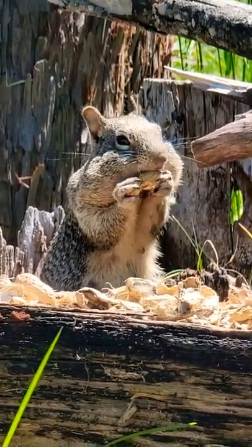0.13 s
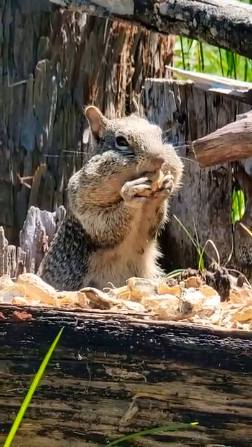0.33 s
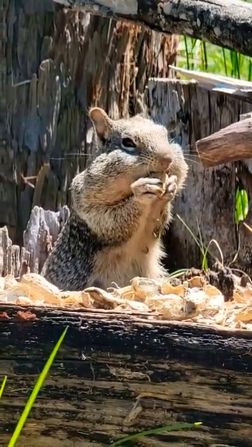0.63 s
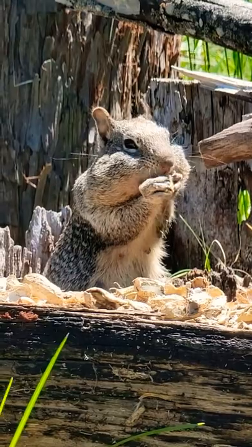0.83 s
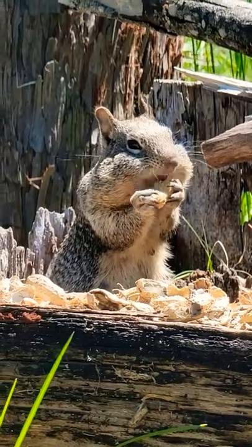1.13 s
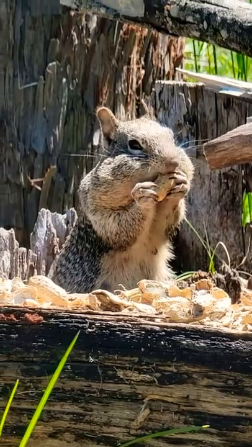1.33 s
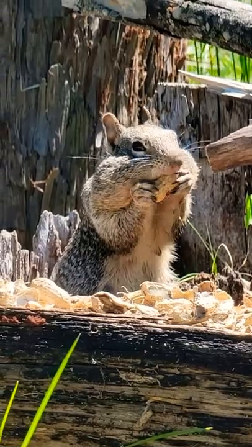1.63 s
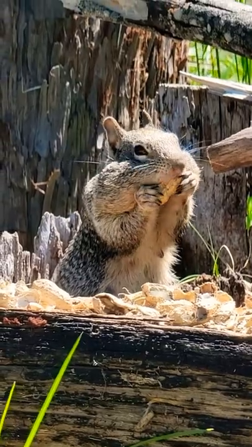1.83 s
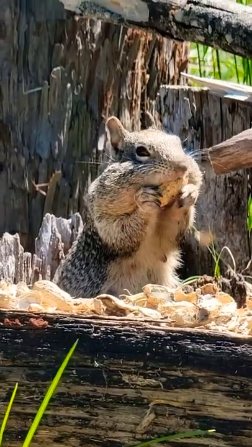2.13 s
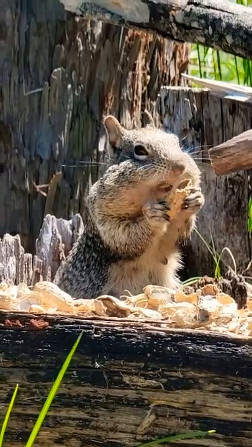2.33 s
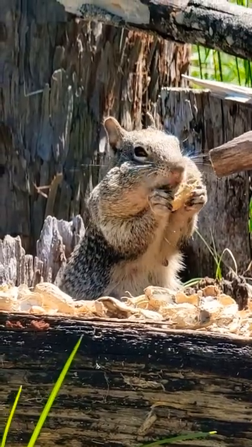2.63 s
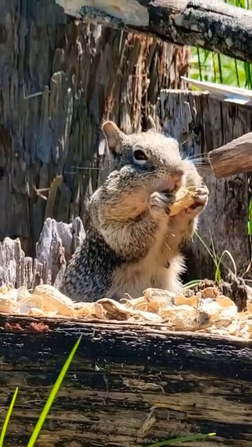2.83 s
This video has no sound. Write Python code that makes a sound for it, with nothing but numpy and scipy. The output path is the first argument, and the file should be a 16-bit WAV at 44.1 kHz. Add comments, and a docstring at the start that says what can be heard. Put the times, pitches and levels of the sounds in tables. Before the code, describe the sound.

A squirrel close to the microphone cracks a peanut shell in crisp, uneven clicks with faint gnawing, mostly in the first half; a bird repeats falling two-note chirps across a yard over low rumble and distant traffic.

```python
"""Squirrel cracking a peanut

A squirrel cracks a peanut shell with its teeth, close by, on a log in front of a stump.
Each crack is a click and short noise ringing a piece of shell; gnawing is a swell of tiny ticks.
Further off a bird repeats a falling two-note chirp, made of wavering sine tones with yard echoes.
Under both, shaped noise makes a low, lumpy rumble and distant traffic wash, with a faint hum."""
import sys
import numpy as np
from scipy import signal
from scipy.fft import rfft, irfft
from scipy.io import wavfile

SR = 44100
rng = np.random.default_rng(int(sys.argv[2]) if len(sys.argv) > 2 else 0)


def dump_mix(stems):
    """Bounce the given channels to the path in sys.argv[1] as a 16-bit WAV at rate SR."""
    frames = np.atleast_2d(stems).T  # one column per channel
    limited = np.clip(frames, -1, 1)  # hard clip at full scale
    pcm = np.round(limited * 32767).astype(np.int16)
    wavfile.write(sys.argv[1], SR, pcm)


N = 131859  # length in samples, about 3 s

# Shell cracks: start_s, level_db, crumble_s (fade time of the crumbling noise), ring_hz,
# ring_db, hollow_db (the shell's hollow sound), treble_db
CRACKS = [ (0.3364, -37, 0.00055, 8100, -4, -10, 3), (0.3446, -27, 0.00025, 10200, 9.5, 6, 3.5),
          (.3531, -33, .0004, 8100, 8, 0, 7), (0.656, -47.5, .003, 6000, 16.5, -4, -14),
          (0.7275, -42, .0006, 7500, 9, -6, 3), (.7466, -14, .0003, 5650, 17, -6, 0),
          (.7623, -29, .0006, 5600, 4, 13, -11), (0.9175, -19.5, 0.00055, 7760, 10.5, 12.5, -10),
          (0.9193, -22.5, 0.0008, 6300, 11, 10.5, -1.5), (0.946, -34, 0.0025, 7200, 4, -6, -4),
          (1.0470, -42, .0004, 8000, 0, -7, -3), (1.0683, -17.5, 0.00034, 4640, 5.5, 0.5, -1.5),
          (1.0794, -28, .0009, 14000, 8, -2, -1), (1.1940, -31, .001, 7000, 0, -13, -11),
          (1.1970, -32, 0.00042, 5450, 10, -17, 7.5), (1.1990, -26.5, 0.00056, 6100, 10, -10, 2.5),
          (2.367, -46, 0.00102, 6050, 14, -12, 2), (2.427, -46.5, 0.0058, 7460, 8, -10, 5.5),
          (2.8788, -51, .0015, 7200, 11, -10, -11)]
# Gnawing between cracks: start_s, end_s, level_db, treble_db
GNAWS = [(0.25, 0.443, -78.5, 7), (0.587, 0.748, -74.5, -22), (0.709, 0.825, -68.5, -13),
         (0.875, 1.291, -79.5, -7), (1.293, 1.468, -77.5, -29), (2.082, 2.24, -88, -0.5),
         (2.299, 2.491, -78, -8), (2.592, 2.7, -87, -14)]
# Echoes off the log and stump: left_delay_s, right_delay_s, level_db
WOOD_ECHOES = [(.0006, .0004, -10), (.0016, .0021, -10), (.0031, .0028, -15)]
STUMP_T60_S, STUMP_DB = .025, -7  # T60: time for an echo to fade by 60 dB
CRACK_YARD_T60_S, CRACK_YARD_DB = .13, -14
CRACK_PAN_DB = .6  # left goes up by this much, right goes down


def squirrel():
    """Cracks and gnawing arrive directly, then bounce off the wood nearby and the yard."""
    dry = np.zeros((2, N))
    for start_s, *settings in CRACKS:
        add(dry, start_s, crack(*settings))
    for start_s, end_s, level_db, treble_db in GNAWS:
        add(dry, start_s, gnaw(end_s - start_s, level_db, treble_db))

    near = dry.copy()
    for left_s, right_s, echo_db in WOOD_ECHOES:
        add(near[0], left_s, amp(echo_db) * dry[0])
        add(near[1], right_s, amp(echo_db) * dry[1])
    stump = amp(STUMP_DB) * tail(STUMP_T60_S, 0.0012)
    yard = amp(CRACK_YARD_DB) * tail(CRACK_YARD_T60_S, 0.0089)
    return (near + through(dry, stump + yard)) * amp([[CRACK_PAN_DB], [-CRACK_PAN_DB]])


# Basic tone of a snap: pitch_hz, level_db
SNAP = [(300, -14), (1500, -8), (2600, -7.5), (4200, -4.5), (5200, 0.5), (6800, -8), (8000, 5), (9400, -9),
        (10600, 7), (12000, -3.5), (13200, 1.5), (15000, 2.5), (15800, -4), (17000, -26)]
CLICK_GAIN, CRUMBLE_GAIN = .9, .7
# Late splinters: average rate, loudness, and fade time
SPLINTERS_PER_S, SPLINTER_DB, SPLINTER_S = 600, -9, .007
# Each piece gets random ups and downs in tone, one every PIECE_STEP_HZ
PIECE_DB, PIECE_STEP_HZ = 4, 300
RING_WIDTH_HZ = 1400
HOLLOW_HZ, HOLLOW_HALF_WIDTH_HZ = 3260, 390
TREBLE_PAN_DB = 0.8  # treble goes up by this much on the left, down on the right


def crack(level_db, crumble_s, ring_hz, ring_db, hollow_db, treble_db):
    """A snap, tiny fractures and late splinters ring a piece of shell; no two ring alike."""
    t = np.arange(1024) / SR
    spray = rng.standard_normal((2, len(t))) * np.exp(-t / crumble_s)
    spray[1] = 0.16 * spray[0] + 3.2 * spray[1]  # left and right are only slightly alike
    drive = CRUMBLE_GAIN * spray / np.linalg.norm(spray, axis=1, keepdims=True)
    drive[:, 0] += CLICK_GAIN
    is_splinter = rng.random(len(t)) < SPLINTERS_PER_S / SR
    splinters = rng.uniform(-0.83, 1, len(t)) * is_splinter
    drive += amp(SPLINTER_DB) * splinters * np.exp(-t / SPLINTER_S)

    hz = np.fft.rfftfreq(2048, 1 / SR)
    ring = amp(ring_db) / np.sqrt(1 + ((hz - ring_hz) / (RING_WIDTH_HZ / 2)) ** 4)
    hollow = amp(hollow_db) / (1 + ((hz - HOLLOW_HZ) / HOLLOW_HALF_WIDTH_HZ) ** 2)
    mode_hz = np.arange(0, SR / 2, PIECE_STEP_HZ)
    mode_db = PIECE_DB * rng.uniform(-1.1, 1, len(mode_hz))
    piece = unit(amp(np.interp(hz, mode_hz, mode_db)))
    treble = np.clip((hz - 7000) / 4000, 0, 1)  # starts at 7 kHz, full at 11 kHz
    shell = []
    for side in (1, -1):
        body = amp(read(SNAP, hz) + (treble_db + side * TREBLE_PAN_DB) * treble)
        shell.append(causal(piece * np.sqrt(body ** 2 + ring ** 2 + hollow ** 2)))
    return amp(level_db) * through(drive, np.array(shell))


GNAW_TICKS_PER_S = 450  # average rate


def gnaw(length_s, level_db, treble_db):
    """Teeth scrape the shell: a swell of tiny uneven ticks, each ringing the same piece."""
    size = round(length_s * SR)
    strength = amp(1.7 * np.minimum(rng.exponential(1, size), 4))
    is_tick = rng.random(size) < GNAW_TICKS_PER_S / SR
    swell = np.sin(np.linspace(0, np.pi, size)) ** 2
    ticks = strength * is_tick * rng.choice([-1, 1], size) * swell
    piece = crack(0, crumble_s=1 / SR, ring_hz=5630, ring_db=2.7, hollow_db=3.6, treble_db=treble_db)
    return amp(level_db) * unit(through(ticks, piece))


# All bird levels are those before the yard settings below.
# Chirps: start_s, upper_hz, upper_db, upper_second_voice_db,
# lower_delay_s, lower_hz, lower_db, lower_second_voice_db
CHIRPS = [ (-.065, 4080, -53, -60, 0.045, 3263, -53.5, -57), (.275, 4090, -58, -61, 0.066, 3290, -48, -55),
          (.673, 4070, -52.5, -57, 0.054, 3270, -49, -52), (1.012, 4070, -49.5, -58, 0.055, 3246, -48, -53),
          (1.378, 4127, -53, -61, 0.057, 3250, -50, -55), (1.938, 4330, -49.5, -62, .072, 3313, -52, -57),
          (2.345, 4125, -55, -57.5, .072, 3260, -48.5, -52.5)]
# Shape of each note: share of its length, pitch ratio, level_db
UPPER_SHAPE = [(0, 1.005, -12), (.18, 1.0, 0), (.65, .99, -1), (1, .95, -10)]
LOWER_SHAPE = [(0, 1.03, -9), (.2, 1.01, 0), (.6, .99, -1), (1, .965, -8)]
UPPER_S, LOWER_S = 0.0556, 0.0471  # note lengths
UPPER_WAVER, LOWER_WAVER = .018, .025  # pitch waver as a share of the pitch
# The lower second voice of each note: pitch ratio, delay in seconds
UPPER_SECOND, LOWER_SECOND = (.825, .012), (.885, .028)
# Faint twitters and whistles: start_s, length_s, from_hz, to_hz, level_db, waver (share of pitch)
WHISTLES = [ (.192, .08, 5070, 5200, -68.5, .03), (0.215, 0.082, 5500, 5560, -72, 0.01),
            (.262, .04, 4550, 4210, -66, .04), (0.445, 0.096, 3860, 3925, -68.5, 0.044),
            (.778, .09, 4950, 5000, -61, .042), (.865, .045, 4250, 4900, -59.5, .04),
            (0.947, 0.074, 3482, 3320, -61.5, 0.057), (1.543, 0.031, 3427, 3290, -58.5, .03),
            (1.92, .09, 5200, 4800, -69, .045), (1.995, .05, 3950, 3600, -60, .03),
            (1.44, .07, 3950, 3550, -59, .04), (1.1, .05, 3650, 3450, -59, .03),
            (2.385, .07, 4050, 3650, -57.5, .035), (2.34, 0.124, 4660, 4670, -69.5, 0.057),
            (2.56, 0.022, 2900, 3020, -64.5, 0.021), (2.954, 0.033, 4280, 4410, -67.5, 0.016)]
# One clear peep from a nearer perch: start_s, length_s, pitch_hz, level_db, waver (share of pitch)
PEEP = (2.588, .058, 3590, -59, .007)
CHIRP_DIRECT_DB, WHISTLE_DIRECT_DB, PEEP_DIRECT_DB = -7, -23, 0
BIRD_YARD_DB, PEEP_YARD_DB = -2.5, -10


def bird():
    """Chirps of two sagging notes in two voices, smeared by the yard; faint twitters and a peep."""
    song = np.zeros((2, N))
    for start_s, upper_hz, upper_db, upper_2_db, lag_s, lower_hz, lower_db, lower_2_db in CHIRPS:
        add_chirp_note(song, start_s, UPPER_SHAPE, UPPER_S, upper_hz, upper_db,
                       upper_2_db, UPPER_WAVER, UPPER_SECOND)
        add_chirp_note(song, start_s + lag_s, LOWER_SHAPE, LOWER_S, lower_hz, lower_db,
                       lower_2_db, LOWER_WAVER, LOWER_SECOND)

    for start_s, length_s, from_hz, to_hz, level_db, waver in WHISTLES:
        glide = to_hz / from_hz
        shape = [(0, 0.987, 3.5), (.5, np.sqrt(glide), 3.5), (1, glide, -7.5)]
        whistle = note(shape, length_s, from_hz, level_db, waver)
        add(song, start_s, across_yard(whistle, WHISTLE_DIRECT_DB, BIRD_YARD_DB))

    peep = note([(0, 1, -16), (.45, 1, 1), (1, 1, -19)], *PEEP[1:])
    add(song, PEEP[0], across_yard(peep, PEEP_DIRECT_DB, PEEP_YARD_DB))
    return song


def add_chirp_note(song, start_s, shape, length_s, pitch_hz, level_db, second_db, waver, second):
    """One note of a chirp: a first voice, then a lower one joining a little later."""
    ratio, delay_s = second
    first_voice = note(shape, length_s, pitch_hz, level_db, waver)
    second_voice = note(shape, length_s, pitch_hz * ratio, second_db, waver)
    add(song, start_s, across_yard(first_voice, CHIRP_DIRECT_DB, BIRD_YARD_DB))
    add(song, start_s + delay_s, across_yard(second_voice, CHIRP_DIRECT_DB, BIRD_YARD_DB))


WAVER_HZ, GRAIN_HZ = 220, 160  # how fast the pitch and the level wander
BUZZ_HZ, BUZZ_DEPTH = 370, 1.2  # depth is a multiple of the waver
GRAIN_DB_PER_WAVER = 170


def note(shape, length_s, pitch_hz, level_db, waver):
    """A sliding whistle; the more it wavers, the more it buzzes and breaks into grains."""
    share = np.linspace(0, 1, round(length_s * SR))
    size = len(share)
    at, ratio, shape_db = np.transpose(shape)
    buzz = np.sin(2 * np.pi * (BUZZ_HZ * length_s * share + rng.random()))
    wobble = 1 + waver * (wander(size, WAVER_HZ) + BUZZ_DEPTH * buzz)
    hz = pitch_hz * np.interp(share, at, ratio) * wobble
    phase = 2 * np.pi * np.cumsum(hz) / SR
    grains = unit(amp(GRAIN_DB_PER_WAVER * waver * wander(size, GRAIN_HZ)))
    soft_ends = signal.get_window(("tukey", .2), size)
    level = amp(level_db + np.interp(share, at, shape_db)) * soft_ends
    return np.sqrt(2) * level * grains * np.sin(phase)


# Echoes of the calls off trees and walls: delay_s, level_db
YARD_ECHOES = [(.032, -5), (.06, -12)]
YARD_EARLY_T60_S, YARD_LATE_T60_S, YARD_LATE_DB = 0.1, 0.57, -9.5  # late level is next to early


def across_yard(sound, direct_db, yard_db):
    """A call arrives directly and by scattered echoes, which differ from call to call."""
    yard = tail(YARD_EARLY_T60_S, 0.0037) + amp(YARD_LATE_DB) * tail(YARD_LATE_T60_S, 0.062)
    for delay_s, echo_db in YARD_ECHOES:
        add(yard, delay_s, amp(echo_db) * tail(0.13, 0.00078))
    yard = amp(yard_db) * yard
    yard[:, 0] += amp(direct_db)
    return through(sound, yard)


# Tone of the traffic wash and of the rumble: pitch_hz, level_db
WASH = [(100, -14), (150, -2), (200, 1), (300, -5.5), (410, -13), (750, -5.5), (950, -4), (1220, -4),
        (1570, -7.5), (2330, -21.5), (3200, -22), (4000, -27.5), (5500, -32), (8400, -42), (11000, -44),
        (12500, -36.5), (15000, -40.5)]
RUMBLE = [(15, -7.5), (30, -9), (48, 1), (62, 5), (80, -1.5), (105, -6), (150, -16.5), (200, -31),
          (400, -65.5)]
# Left-right balance of each: pitch_hz, left_minus_right_db
WASH_BALANCE = [(100, -3), (300, -4), (550, 2), (1100, -6), (2200, -4.5), (5000, -3), (12000, 2)]
RUMBLE_BALANCE = [(30, -5), (70, 3), (130, -9)]
# Rumble over time: start_s, level_db (before lift and gusts), left_minus_right_db (before LEAN_SHARE)
SWELL = [(0.0, -55, -1), (0.04, -45.5, 7), (0.25, -43, 14.5), (0.31, -46, 4), (0.51, -47.5, 3),
         (0.539, -42, 6), (0.6, -55, -7), (0.64, -47.5, 11), (0.76, -51, -3.5), (1.27, -49, -0.5),
         (1.41, -53, 6), (1.44, -42, 15.5), (1.58, -53.5, 2), (1.679, -46, 13), (2.0, -52, -3),
         (2.69, -49, 1), (2.849, -48, 13.5), (2.95, -57.5, -7.5), (2.98, -46.5, 2.0)]
LEAN_SHARE = 0.8
WASH_DB, RUMBLE_LIFT_DB = -57, 1
GUST_DB, GUST_S = 1.5, 0.081  # typical size of the gusts, and their shortest time scale
HUM_HZ, HUM_WANDER_HZ, HUM_DB = 119.85, 4.115, -59


def background():
    """Distant traffic wash, a lumpy rumble that gusts mostly on the left, a faint wavering hum."""
    t = np.arange(N) / SR
    wash = noise_pair(WASH, WASH_BALANCE, (300, 2000))
    rumble = noise_pair(RUMBLE, RUMBLE_BALANCE, (25, 100))
    at, level_db, lean_db = np.transpose(SWELL)
    swell_db = np.interp(t, at, level_db) + GUST_DB * wander(N, 1 / GUST_S)
    lean = amp(LEAN_SHARE * np.interp(t, at, lean_db) * np.array([[.5], [-.5]]))
    hum_hz = HUM_HZ + HUM_WANDER_HZ * wander(N, 6.28)
    hum = unit(np.sin(2 * np.pi * np.cumsum(hum_hz) / SR))
    return amp(WASH_DB) * wash + amp(swell_db + RUMBLE_LIFT_DB) * lean * rumble + amp(HUM_DB) * hum


# How alike left and right are: pitch_hz, likeness (0 unrelated, 1 the same)
LIKENESS = [(30, 0.34), (70, 0.79), (130, 0.96), (500, 0.74), (1100, 0.88), (2500, 0.033), (12000, 0.077)]
TOP_HZ = 15500


def noise_pair(spectrum, balance, band_hz):
    """Partly alike left and right noise; their average has rms 1 within the band."""
    hz = np.fft.rfftfreq(N, 1 / SR)
    a, b = rfft(rng.standard_normal((2, N)))
    same = np.clip(read(LIKENESS, hz), -1, 1)
    lean_db = read(balance, hz) / 2
    left = a * amp(lean_db)
    right = (same * a + np.sqrt(1 - same ** 2) * b) * amp(-lean_db)
    pair = np.array([left, right]) * amp(read(spectrum, hz)) * (hz < TOP_HZ)
    in_band = (hz > band_hz[0]) * (hz < band_hz[1])
    return irfft(pair, N) / irfft(pair.mean(0) * in_band, N).std()


def amp(db):
    """Turns decibels into a multiplier."""
    return 10 ** (np.asarray(db) / 20)


def unit(x):
    """Scales to rms 1 (rms is a kind of average strength)."""
    return x / np.sqrt(np.mean(x ** 2) + 1e-20)


def read(points, hz):
    """Reads between a table's points, on a log-frequency axis."""
    f, value = np.transpose(points)
    return np.interp(np.log(hz + 1), np.log(f + 1), value)


def add(mix, start_s, sound):
    """Adds a sound to the mix; anything before the beginning or past the end is cut off."""
    at = round(start_s * SR)
    sound = sound[..., max(-at, 0):]
    part = mix[..., max(at, 0):][..., :sound.shape[-1]]
    part += sound[..., :part.shape[-1]]


def wander(size, hz):
    """Smooth random drift, cut from 4 s of rms 1; faster changes than hz fade out."""
    f = np.fft.rfftfreq(SR * 4, 1 / SR)
    noise = rfft(rng.standard_normal(2 * len(f) - 2))
    return unit(irfft(noise * np.exp(-(f / hz) ** 2)))[:size]


def causal(gain):
    """Turns gains per frequency into a ring that starts at once (minimum phase)."""
    both_halves = np.r_[gain, gain[-2:0:-1]]
    log_gain = np.log(np.maximum(both_halves, 1e-5))
    return np.fft.ifft(np.exp(np.conj(signal.hilbert(log_gain)))).real


def tail(t60_s, rise_s):
    """Scattered stereo echo: noise that rises, then fades by 60 dB in t60_s; energy 1 a side."""
    t = np.arange(SR) / SR
    fade = np.exp(-np.log(1000) * t / t60_s)
    echo = rng.standard_normal((2, SR)) * fade * (1 - np.exp(-t / rise_s))
    return echo / np.linalg.norm(echo, axis=1, keepdims=True)


def through(x, response):
    """Passes a sound through a stereo response (convolution)."""
    return signal.fftconvolve(np.atleast_2d(x), response, axes=1)[:, :N]


def scene():
    """Squirrel, bird and yard together."""
    return squirrel() + bird() + background()


EDGE_HZ = 16500


def record(dry):
    """The recorder's band limit: a filter removes what lies above EDGE_HZ."""
    low_pass = signal.firwin(511, EDGE_HZ, window=("kaiser", 9), fs=SR)
    return signal.oaconvolve(dry, low_pass[None], "same")


dry = scene()
out = record(dry)
dump_mix(out)
```